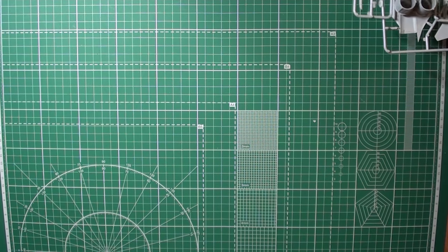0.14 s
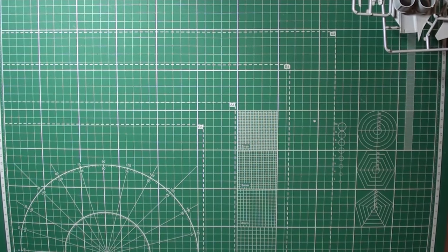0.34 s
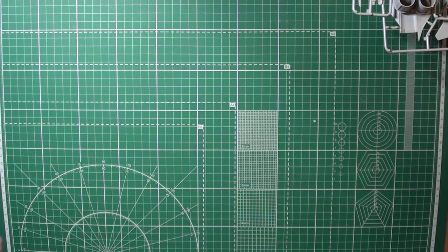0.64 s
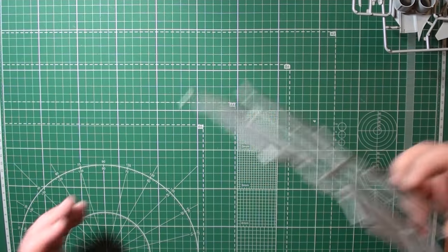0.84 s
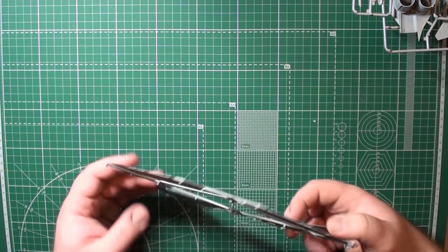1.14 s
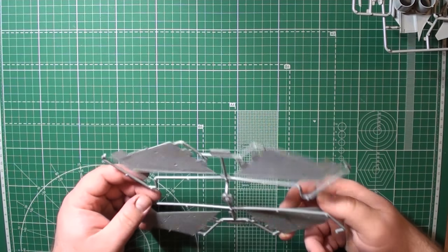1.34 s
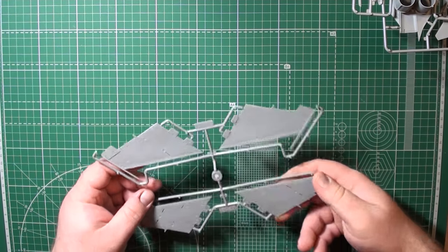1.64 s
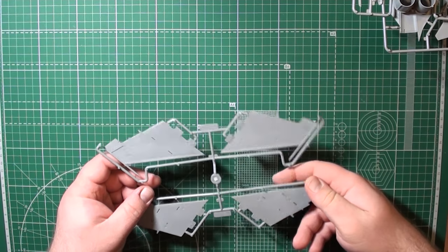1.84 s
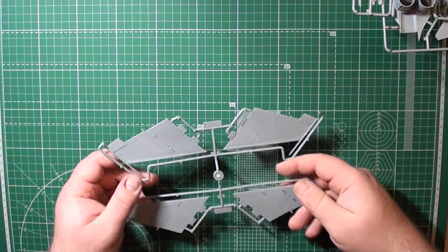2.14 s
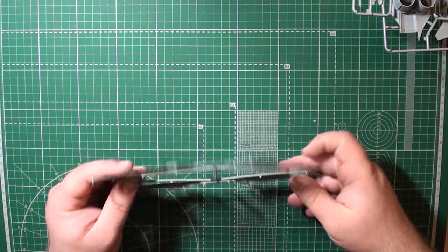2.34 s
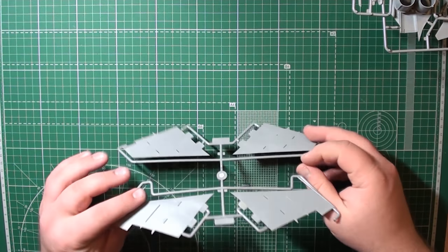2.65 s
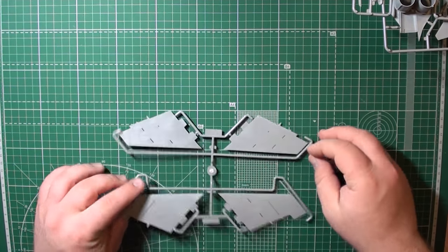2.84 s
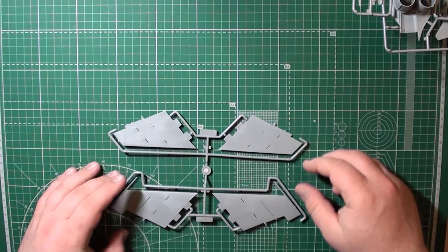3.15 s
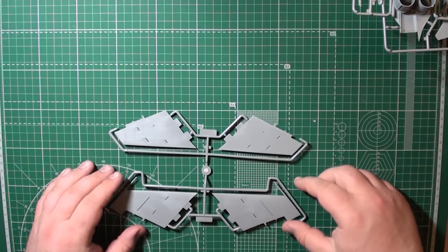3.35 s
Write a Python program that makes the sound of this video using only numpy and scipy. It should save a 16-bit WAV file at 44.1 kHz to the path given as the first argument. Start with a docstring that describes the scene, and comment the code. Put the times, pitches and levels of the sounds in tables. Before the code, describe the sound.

Dry plastic snaps from a model-kit frame: a small cluster slightly to the left, isolated ticks, then a dense clatter and grainy sliding on a desk mat, closely miked in a small quiet room.

```python
"""Small clicks and a faint sliding rattle: a thin plastic parts frame is lifted off a pile.
It then ticks between the fingers and is laid, louder and rattling, on a hard mat.
Each contact is a short run of snaps that rings the frame's brief tones; sliding is grainy noise.
The desk thuds softly, a small room answers with echoes and a dying noise tail,
and a quiet hum and microphone hiss lie below."""
import sys
import numpy as np
from scipy import signal
from scipy.fft import rfft, irfft
from scipy.io import wavfile
from scipy.ndimage import uniform_filter1d

SR = 44100
rng = np.random.default_rng(int(sys.argv[2]) if len(sys.argv) > 2 else 0)


def pcm_store(signal):
    """Save signal as 16-bit PCM."""
    levels = np.round(np.clip(np.atleast_2d(signal), -1, 1) * 32767)
    wavfile.write(sys.argv[1], SR, levels.astype(np.int16).T)


N = 154350  # length of the scene in samples, 3.5 s


def from_db(db):
    """Turns decibels into a plain amplitude factor."""
    return 10 ** (np.asarray(db) / 20)


def unit_rms(x):
    """Scales a sound to an RMS level of one."""
    return x / np.sqrt(np.mean(x ** 2) + 1e-20)


def read_curve(hz, points):
    """Reads a curve of (frequency [Hz], value) points, joined by lines on a log-frequency axis."""
    table = np.array(points, float)
    return np.interp(np.log(np.maximum(hz, 1)), np.log(table[:, 0]), table[:, 1])


def colour(x, points):
    """Makes each frequency louder or softer, following (frequency [Hz], gain [dB]) points."""
    hz = np.fft.rfftfreq(x.shape[-1], 1 / SR)
    return irfft(rfft(x) * from_db(read_curve(hz, points)), x.shape[-1])


def fade(t, t60):
    """Dies away exponentially, falling 60 dB in t60 seconds."""
    return np.exp(-np.log(1000) * t / np.maximum(t60, 1e-3))


HUM_HZ, HUM_RMS_DB, HUM_WAVER = 120, -69.5, 0.18  # waver: RMS change as a share of the loudness


def hum():
    """A low steady tone whose strength wavers slowly at random."""
    tone = np.sqrt(2) * from_db(HUM_RMS_DB) * np.sin(2 * np.pi * HUM_HZ * np.arange(N) / SR)
    waver = unit_rms(colour(rng.standard_normal(N), [(6, 0), (20, -40)]))
    return tone * (1 + HUM_WAVER * waver)


# Tone colour of the room noise and hiss: (frequency [Hz], relative level [dB per Hz])
AIR_COLOUR = [(18, -35), (30, -13), (59, -3), (81, -17.5), (109, -1), (311, -6), (426, -4.5), (649, -6.5),
              (866, -10.5), (1460, -13), (1910, -12.5), (2610, -14.5), (3580, -15.5), (3870, -13.5),
              (16000, -19)]
# Stereo width of that noise: (frequency [Hz], side level against mid [dB])
AIR_WIDTH = [(60, -20), (110, -20), (200, -9.5), (380, -6.5), (700, -3), (1290, -0.5), (2380, -3),
             (4400, -7.5), (8120, -10), (15000, -53)]
AIR_DB = -54.5  # RMS of the mid signal before the microphone


def air():
    """Steady room noise and hiss: random noise, widest in the middle range."""
    mid, side = colour(rng.standard_normal((2, N)), AIR_COLOUR)
    side = colour(side, AIR_WIDTH)
    return from_db(AIR_DB) / mid.std() * np.array([mid + side, mid - side])


# Room tail: (frequency [Hz], time to fall 60 dB [s], level [dB], side level against mid [dB])
ROOM_TAIL = [(293, 0.81, -3, -16), (1020, 0.31, 5.5, -9), (2500, 0.34, -4, -12.5), (6300, 0.37, -7, -7),
             (10100, 0.15, 0, -13), (14000, 0.073, -20, -18)]
# Early echoes off desk and wall: (delay [s], level [dB], left against right [dB])
EARLY_ECHOES = [(.0045, -8.5, 0.5), (.013, -11, 1), (.021, -16, -2)]
# Duller colour of those echoes: (frequency [Hz], gain [dB])
ECHO_COLOUR = [(6000, 0), (11000, -3), (15000, -16)]
TAIL_RISE_S = 0.0045


def room_tail():
    """Stereo noise that dies at its own speed in each frequency band, as sound in a room does."""
    t = np.arange(SR // 2) / SR
    mid, side = rng.standard_normal((2, len(t)))
    side = colour(side, [row[::3] for row in ROOM_TAIL])
    hz, when, bands = signal.stft(np.array([mid + side, mid - side]), SR, nperseg=256)
    t60 = read_curve(hz, [row[:2] for row in ROOM_TAIL])[:, None]
    level = from_db(read_curve(hz, [row[::2] for row in ROOM_TAIL]))[:, None]
    gain = level / np.sqrt(t60 * SR / (2 * np.log(1000)))  # longer fades do not get more energy
    tail = signal.istft(bands * gain * fade(when, t60), SR, nperseg=256)[1][:, :len(t)]
    return tail * np.minimum(t / TAIL_RISE_S, 1) ** 2


def room(x):
    """Adds echoes to the left and right rows, and a room tail fed by the third row."""
    direct, room_feed = x[:2], x[2:]
    echoes = np.zeros_like(direct)
    for delay, db, pan_db in EARLY_ECHOES:
        sides = from_db([[db + pan_db / 2], [db - pan_db / 2]])
        echoes += sides * np.roll(direct, int(delay * SR), axis=1)
    near = direct + colour(echoes, ECHO_COLOUR)
    return near + signal.fftconvolve(room_feed, room_tail(), axes=1)[:, :N]


THUD_RISE_S, THUD_T60_S = 0.0027, 0.23
# The desk thuds under hand or frame: (time [s], strength [dB], centre pitch [Hz])
DESK_THUDS = [(.325, -48, 184), (2.646, -45, 360), (2.65, -50, 550), (2.841, -45.5, 243),
              (2.97, -37.5, 352), (3.125, -42.5, 645)]


def thuds():
    """Soft low knocks of the desk: noise around one pitch that swells quickly and dies."""
    out, t = np.zeros(N + SR), np.arange(SR // 2) / SR
    swell = (1 - np.exp(-t / THUD_RISE_S)) * fade(t, THUD_T60_S)
    for at, db, hz in DESK_THUDS:
        band = [(hz * 0.28, -50), (hz, 0), (hz * 2.44, -40)]
        knock = unit_rms(colour(rng.standard_normal(len(t)), band)) * swell
        start = int(at * SR)
        out[start:start + len(t)] += from_db(db) * knock
    return out[:N]


GRAINS_PER_S, GRAIN_SCATTER_DB, GRAIN_T60_S = 900, 7, 0.009
# Tone colour of the sliding frame: (frequency [Hz], relative level [dB per Hz])
SLIDE_COLOUR = [(88, -45), (150, -6.5), (357, -12.5), (486, -8.5), (612, -1.5), (1380, -12.5), (2230, -0.5),
                (5720, -6.5), (7080, -2.5), (15000, -29)]
# Slides off the pile, under the fingers, then on the mat; each is a list of (time [s], level [dB])
SLIDES = [
    [(0.0, -56.5), (0.144, -50.5), (0.3, -90)],
    [(1.95, -67), (1.968, -78), (1.988, -67), (2.176, -53), (2.228, -69), (2.34, -64)],
    [(2.62, -81), (2.688, -60), (2.816, -43), (3.022, -42.5), (3.122, -42), (3.362, -66.5), (3.5, -60)],
]


def rattle():
    """Sliding makes many tiny uneven contacts: dense grains of noise in the frame's colour."""
    t = np.arange(N) / SR
    chance, strength = rng.random((2, N))
    grain_db = GRAIN_SCATTER_DB * np.minimum(-np.log(strength), 3)
    grains = (chance < GRAINS_PER_S / SR) * from_db(grain_db)
    shape = signal.fftconvolve(grains, fade(t[:1024], GRAIN_T60_S))[:N]
    sound = unit_rms(colour(shape * rng.standard_normal(N), SLIDE_COLOUR))
    gain = np.zeros(N)
    for slide in SLIDES:
        times, levels = np.array(slide).T
        gain += from_db(np.interp(t, times, levels, left=-120, right=-120))
    return sound * uniform_filter1d(gain, size=400)  # smooths over 9 ms


def snap(points):
    """A sharp click with the given spectrum, its energy packed right after the start."""
    hz = np.fft.rfftfreq(1024, 1 / SR)
    cepstrum = irfft(np.log(from_db(read_curve(hz, points))))
    # folding the second half onto the first makes the click start at time zero
    cepstrum[1:512] *= 2
    cepstrum[513:] = 0
    return irfft(np.exp(rfft(cepstrum)))


def crack(tint, length):
    """The snap of plastic on contact, in the contact's colour with its two lowest bands weakened."""
    slope = []
    for band, (hz, db) in enumerate(tint):
        low_cut_db = -12 if band < 2 else 0
        slope.append((hz, db - 10 * np.log10(hz / 1000) + low_cut_db))
    return np.pad(from_db(35) * snap(slope), (0, length - 1024))  # 35 dB sets snap against rings


RING_SCATTER_DB, DETUNE = 2.5, 0.03  # random spread of ring level, and of pitch as a share
EXTRA_RING_DB, EXTRA_RING_T60_S = 5, 0.016
# Rings of frame and desk: (frequency [Hz], relative level [dB], time to fall 60 dB [s])
FRAME_RINGS = [(355.5, -1, 0.21), (606, 2, 0.093), (777, -6.5, .03), (1088, 5, 0.017), (1640, -0.5, 0.026),
               (2224, -3, 0.01), (2477, 3, 0.02), (3165, 5, 0.0043), (3775, -5, 0.0093), (4500, 0.5, 0.009),
               (5530, -14, 0.024), (7000, -0.5, 0.019), (7410, 3, 0.015), (8500, 5, 0.0089),
               (9950, -2.5, 0.012)]


def rings(tint, extra_hz, t):
    """A knock sets frame and desk ringing: fading sines, plus one at the contact's own pitch."""
    hz, ring_db, t60 = np.array(FRAME_RINGS).T
    pitch_chance, level_chance = rng.standard_normal((2, len(hz)))
    f = np.append(hz * (1 + DETUNE * pitch_chance), extra_hz)
    db = np.append(ring_db + RING_SCATTER_DB * level_chance, EXTRA_RING_DB) + read_curve(f, tint)
    t60 = np.append(t60, EXTRA_RING_T60_S)
    sines = np.sin(2 * np.pi * f[:, None] * t)
    return (from_db(db)[:, None] * sines * fade(t, t60[:, None])).sum(axis=0)


TICKS_PER_MS, TICK_SCATTER_DB, FIRST_TICK_DB = 6, 6, 4


def chatter(length_ms):
    """The frame bounces on contact: a first tick, then random ticks of either sign that thin out."""
    chance, strength, sign = rng.random((3, 1000))
    t_ms = np.arange(1000) / SR * 1000
    run = (chance < TICKS_PER_MS * 1000 / SR) * from_db(TICK_SCATTER_DB * np.log(strength))
    run = run * np.exp(-(t_ms / max(length_ms, 0.05)) ** 2) * np.sign(sign - 0.5)
    run[0] = from_db(FIRST_TICK_DB)
    return run


CLICK_RMS_DB = -14  # RMS of the first 8 ms against the listed strength
RINGS_IN_ROOM_DB = -10  # the rings feed the room less than the snap does
# Frequencies of the five colour columns below: [Hz]
CONTACT_COLOUR_HZ = [350, 1050, 2400, 5500, 11000]
# Contacts: (time [s], strength [dB], extra ring [Hz], five colour levels [dB],
#            left against right [dB], chatter length [ms])
CONTACTS = [(0.0162, -30, 1620, -37, -5, -14, -10, -19, 5.5, 2.8),
            (0.0606, -31, 6630, -34, 8, -28, -5, -29, 7, 5.6),
            (0.11, -28.5, 6200, -29, 0, -20, -2, -22, 5, 3),
            (0.117, -23, 7700, -38, -6, -30, -5, -22, 2.5, 6.6),
            (0.121, -21.5, 5900, -19, 1, -16, -2, -36, 0, 6.7),
            (0.1279, -19, 1630, -38, 5.5, -8, -16, -42, 3.5, 2.8),
            (0.1633, -28.5, 1550, -8.5, -11, -16, -14, -28, 4, 5.4),
            (0.3017, -25.5, 3460, -16, -4, -16.5, -15.5, -35, 2.5, 2.8),
            (0.9487, -37, 2020, -8, -25, -12.5, -14, -21, -5, 3.6),
            (1.0836, -44, 4750, -23, -20, -25, 3, -12, 0.0, 4.6),
            (1.182, -22, 8070, -46, -19.5, -25, -15, -22, 0.5, 9),
            (1.5793, -18.5, 5520, -47, -4.5, -21, -9.5, -17, 0.0, 1.8),
            (1.8499, -37.5, 4630, -9, -23, -23, -3, -24, 0.5, 2.3),
            (2.2954, -36.5, 2440, -26, -5, -17, -8, -25, 0, 5.7),
            (2.3733, -20.5, 7030, -22, -14, -17.5, -10, -12, 0.5, 3),
            (2.4177, -19.5, 6300, -25, -18, -22, -6, -10.5, 0.5, 4.3),
            (2.506, -19, 6500, -36, -17, -13.5, -10.5, -11, 0.5, 3.1),
            (2.6423, -11, 3350, -18.5, -12.5, -12, -10.5, -30, 1, 5.3),
            (2.6641, -20.5, 1980, -13, -5, -3, -23, -47, 2, 1),
            (2.699, -21, 2320, -6, -13, -7.5, -12, -32, 0.0, 9),
            (2.7292, -24, 2880, -16, 9, -3, -15, -17, 0.5, 2.2),
            (2.7592, -19, 2260, -38, -29, -3, -6, -11.5, 2.5, 2.8),
            (2.7992, -21, 4970, -13, -3, -6, -1, -21, 0.0, 9),
            (2.821, -8, 2590, -24, -66, 17, -50, -4, 2, 2.5),
            (2.8243, -5, 6400, -21.5, -47, -21, -4.5, -34, 1, 3.7),
            (2.8398, -12.5, 2820, -24, -27, -15, -21, -23, -3, 3.1),
            (2.8505, -13.5, 2560, -21, -30, -17, -14, -21, 2, 3.3),
            (2.9589, -47, 2750, -23, -40, -14, -14, -28, -2, 4.3),
            (2.9646, -15.5, 2350, -49, -13, 9, -32, -33, 3, 2.8),
            (2.9656, -9.5, 6750, -20, -45, -18.5, -7, -16, -0.5, 9),
            (2.9746, -9, 2390, -27, -20, -2, 2, -18, 1, 5.2),
            (2.984, -30, 2500, -11, -22, -29, -12, -19, 0.0, 3.6),
            (3.025, -14, 3520, -37, -21, -19, -8.5, -35, 0, 3.1),
            (3.0705, -16.5, 6730, -20, -28, -11, -6, -27, -2, 4.9),
            (3.0784, -21.5, 2250, -33, -35, -8, -8, -11, 5.5, 4.8),
            (3.1039, -17.5, 7140, -28, -31, -2.5, -6.5, -20, -1, 7.8),
            (3.1288, -15, 7140, -24, -41, -18.5, -14, -30, -0.5, 4.1),
            (3.1446, -16, 4750, -28, -36, 2, -7, -24, 0.0, 2.5),
            (3.1813, -18, 6900, -14, -29, -21, -3, -18, 1.5, 5.4),
            (3.2107, -21.5, 7300, -25, -46, -8.5, -11, -33, -3, 3),
            (3.2373, -22.5, 7410, -32, -39, -19, 3, -3, -3, 3.3),
            (3.241, -17, 7110, -15, -67, -5, -3.5, -19, 0.5, 3.9),
            (3.2853, -27.5, 6450, -19, -32, -11, 0, -28, 0.0, 4),
            (3.2932, -30, 7050, -25, -13, -18, -5, -24, 0.0, 2.7),
            (3.3351, -28, 3180, 1, -18, -3, -8, -26, -0.5, 3),
            (3.3585, -28, 2860, -13, -45, -10, -13, -29, -0.5, 4),
            (3.3865, -29.5, 2800, -1.5, -14, -6.5, -4, -25, 0, 4.2)]


def clicks():
    """Each contact chatters, every tick a snap plus rings; rows are left, right and room feed."""
    out, t = np.zeros((3, N + 8192)), np.arange(6000) / SR
    for at, strength_db, extra_hz, *levels, pan_db, length_ms in CONTACTS:
        tint = list(zip(CONTACT_COLOUR_HZ, levels))
        ringing = rings(tint, extra_hz, t)
        snapping = crack(tint, len(t))
        hit = signal.fftconvolve(snapping + ringing, chatter(length_ms))
        size = from_db(strength_db + CLICK_RMS_DB) / np.sqrt(np.mean(hit[:350] ** 2))
        start = int(at * SR)
        sides = from_db(np.array([[pan_db], [-pan_db]]) / 2)
        out[:2, start:start + len(hit)] += size * hit * sides
        feed = snapping + from_db(RINGS_IN_ROOM_DB) * ringing
        out[2, start:start + len(feed)] += size * feed * np.std(hit) / np.std(feed)
    return out[:, :N]


# What the thin frame radiates: (frequency [Hz], gain [dB])
FRAME_RADIATION = [(100, -22), (220, -7), (400, -5.5), (1000, -6.5), (1500, -5), (2000, 0), (9000, 2.5),
                   (12000, 7.5), (16000, 0)]


def scene():
    """Contacts, rattle and thuds sound in the room, over steady noise and hum."""
    contacts = colour(clicks(), FRAME_RADIATION)
    return room(contacts + rattle() + thuds()) + air() + hum()


def record(dry):
    """The microphone path steeply cuts the treble above 15750 Hz."""
    return signal.sosfilt(signal.ellip(10, 0.2, 70, 15750, fs=SR, output="sos"), dry)


dry = scene()
out = record(dry)
pcm_store(out)
```